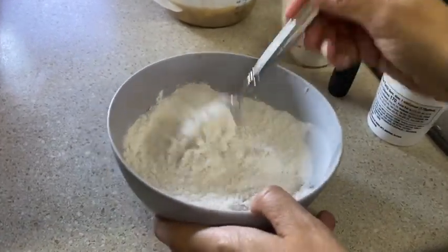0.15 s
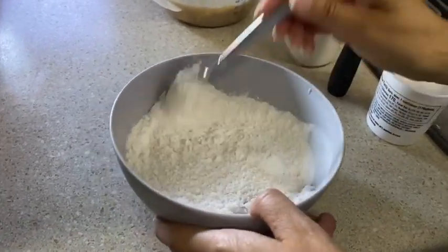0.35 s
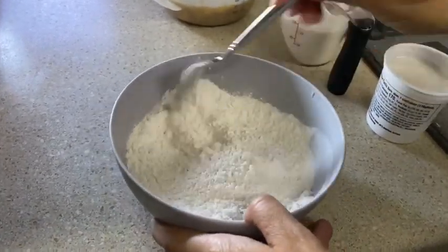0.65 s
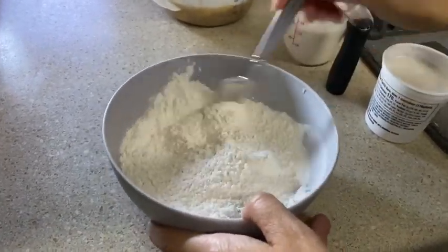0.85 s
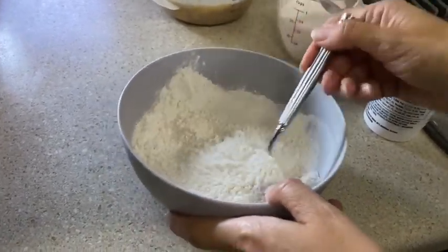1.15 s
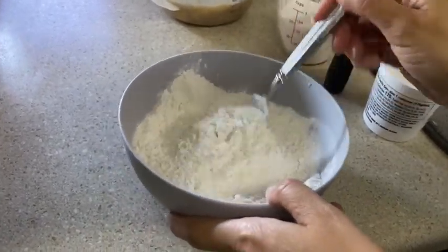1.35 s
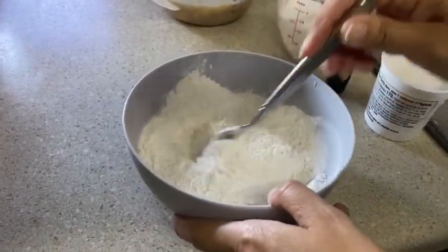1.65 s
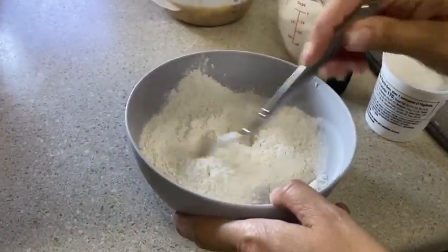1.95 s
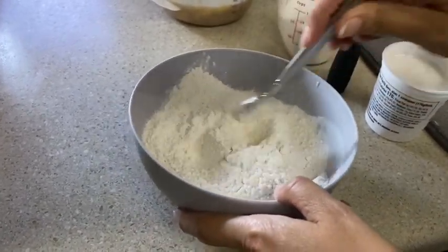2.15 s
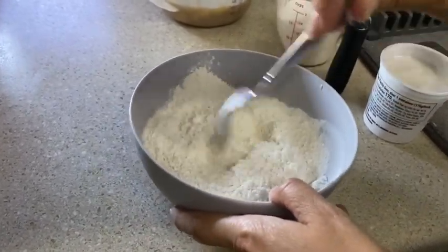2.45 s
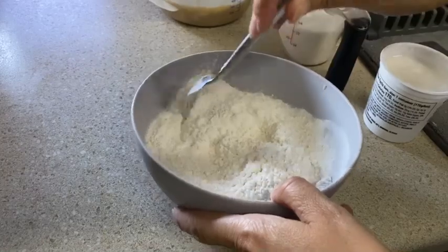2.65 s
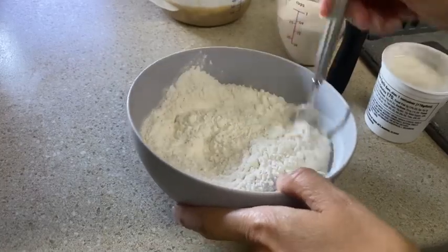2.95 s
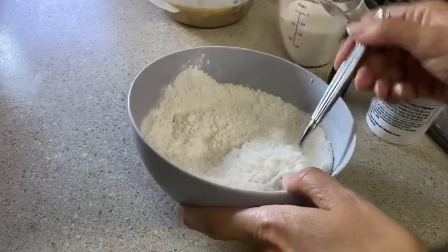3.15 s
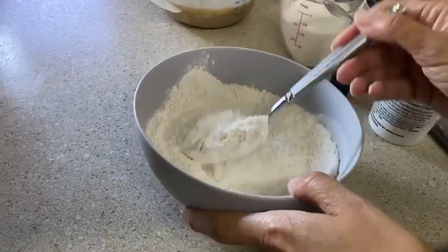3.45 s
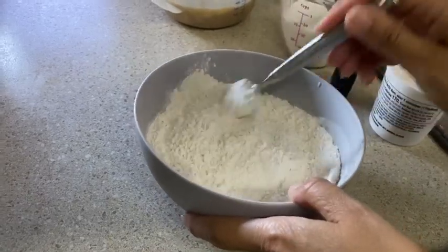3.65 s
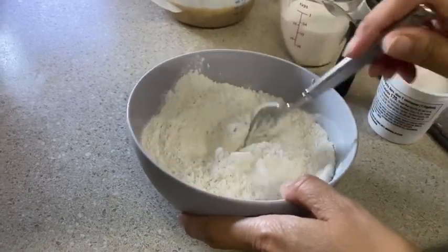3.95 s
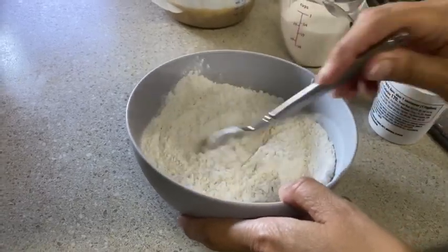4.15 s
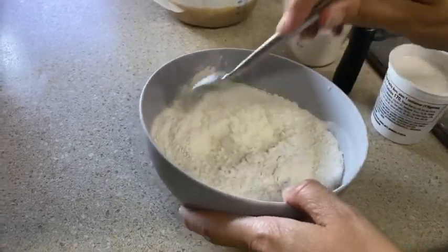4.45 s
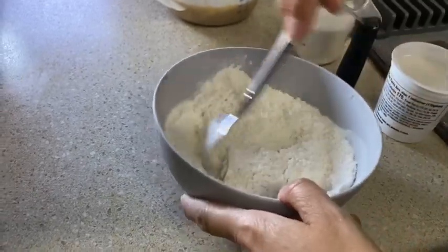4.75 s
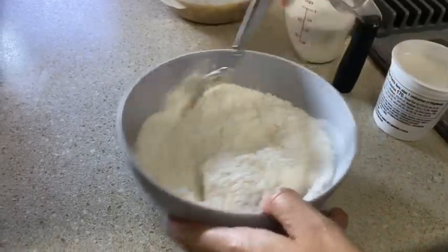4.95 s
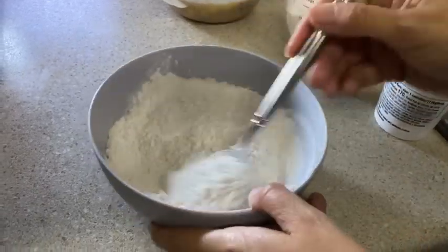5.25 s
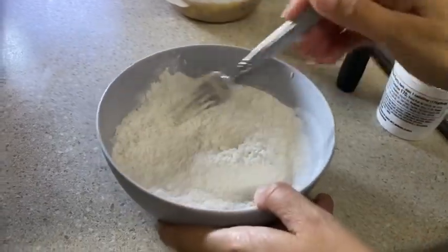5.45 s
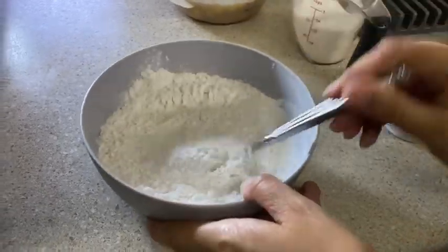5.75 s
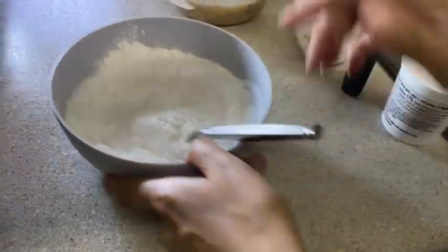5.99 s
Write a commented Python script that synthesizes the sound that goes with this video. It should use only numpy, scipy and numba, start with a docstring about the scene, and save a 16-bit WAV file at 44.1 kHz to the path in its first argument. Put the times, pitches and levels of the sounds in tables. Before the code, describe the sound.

Close up in a kitchen, a metal fork scrapes through flour in quick, uneven strokes. The tines click against the bowl and drag dry powder along its wall, while the bowl knocks and thumps softly on the counter. Underneath lie a faint trickle of flour, a steady low hum and a few barely audible bird peeps. A sharper click and a brief rub of the bowl over the counter finish the stirring.

```python
"""A kitchen counter, where a steel fork stirs flour in a hand-held bowl.
Each stroke lands with a tick of the tines and a dull knock of the bowl, whose foot thumps the counter;
then the tines drag gritty powder along the wall, and the slipping grains set bowl and fork ringing.
Flour trickles between strokes, a low hum fills the room and a far bird peeps.
At last the bowl is slid aside."""
import sys
import numpy as np
from scipy import signal
from scipy.io import wavfile
from scipy.ndimage import uniform_filter1d
from numba import njit

SR = 44100
rng = np.random.default_rng(int(sys.argv[2]) if len(sys.argv) > 2 else 0)


def put_to_file(sound):
    """Save the sound as 16-bit audio at rate SR, in the file named by the first command-line argument."""
    columns = np.atleast_2d(sound).T  # one column per channel
    safe = np.clip(columns, -1, 1)
    whole_steps = np.round(safe * 32767)
    wavfile.write(sys.argv[1], SR, whole_steps.astype(np.int16))


N = 269892

# Fork gestures, one envelope per stroke; drag is the level of the bowl's hollow:
# time_s, drag_db, hollow_hz, wall_db, grit_db
STROKES = [
    [(0.297, -54, 1800, -44, -50), (0.307, -54, 1790, -44, -49), (0.325, -76, 1810, -61, -62)],
    [(0.358, -53, 1740, -31, -26), (0.374, -40, 1850, -30.5, -36), (0.41, -34.5, 1780, -30, -39),
     (0.43, -39, 1770, -37, -41), (0.442, -65, 1850, -49, -53)],
    [(0.647, -51.5, 1940, -38.5, -40.5), (0.735, -42, 1620, -43.5, -52), (0.787, -28.5, 1790, -35, -36.5),
     (0.805, -33.5, 1770, -46, -33), (0.837, -26.5, 1800, -28.5, -29), (0.887, -29, 1930, -30.5, -27.5),
     (0.907, -38.5, 1820, -30.5, -34.5), (1.0, -46, 1990, -45.5, -50)],
    [(1.012, -35.5, 2140, -34.5, -38), (1.024, -26.5, 2300, -30, -42.5), (1.072, -40.5, 2140, -44, -47.5),
     (1.114, -39.5, 2170, -42.5, -50.5), (1.124, -64, 2140, -54, -52)],
    [(1.453, -41.5, 1930, -37.5, -47.5), (1.501, -43.5, 1940, -31, -38.5),
     (1.565, -38.5, 1630, -34.5, -46.5), (1.629, -30.5, 1470, -33, -42), (1.663, -26.5, 1720, -37, -34),
     (1.675, -36, 1810, -34, -40), (1.685, -70, 1850, -54, -45)],
    [(1.741, -37, 2110, -37, -41.5), (1.779, -35.5, 2020, -37.5, -48.5), (1.803, -23.5, 1900, -36.5, -40),
     (1.863, -35.5, 1790, -33.5, -41.5), (1.885, -40.5, 1850, -31, -34.5), (1.945, -34, 1540, -33.5, -41.5),
     (1.979, -39, 1820, -49, -51.5), (2.047, -26, 1760, -30.5, -38.5), (2.068, -79, 1690, -48, -47)],
    [(2.114, -37, 2100, -28.5, -42), (2.132, -35, 2160, -35, -45), (2.18, -29, 2200, -28.5, -37.5),
     (2.22, -33, 1900, -38, -42), (2.274, -29.5, 1880, -34.5, -38.5), (2.292, -51, 1900, -59, -53)],
    [(2.6, -29, 1950, -40, -46), (2.608, -45, 1850, -48.5, -57), (2.686, -32.5, 1730, -27.5, -36.5),
     (2.726, -33, 1720, -36.5, -37.5), (2.794, -28, 1760, -27.5, -38), (2.848, -28, 1800, -37.5, -37),
     (2.89, -40, 1880, -38.5, -42), (2.968, -28.5, 1920, -36.5, -42.5), (3.094, -51.5, 2170, -55, -58),
     (3.11, -46.5, 2250, -48, -53), (3.135, -56, 2230, -55, -58)],
    [(3.163, -51, 2220, -56, -59), (3.201, -73, 1670, -59, -59), (3.211, -87, 1480, -74, -76),
     (3.223, -44.5, 1470, -47, -46), (3.245, -74, 1460, -68, -76)],
    [(3.674, -39, 1700, -42, -47), (3.688, -51, 1780, -44, -52), (3.696, -41.5, 1960, -38, -48),
     (3.834, -31.5, 1700, -31, -42), (3.866, -32, 1600, -36.5, -37), (3.885, -74, 1664, -53, -63)],
    [(3.974, -47, 2040, -47, -43.5), (4.006, -27, 2070, -24, -35), (4.072, -33, 2040, -32.5, -39),
     (4.136, -32.5, 1760, -30.5, -42), (4.186, -34.5, 1730, -44.5, -46.5), (4.195, -69, 1810, -53, -58)],
    [(4.467, -34, 2070, -47, -46.5), (4.489, -45, 1980, -38.5, -42.5), (4.531, -37.5, 1630, -28.5, -33),
     (4.593, -44, 1720, -51, -54.5), (4.605, -61, 1720, -64, -67)],
    [(4.799, -40, 2270, -41, -49), (4.817, -43, 2220, -41, -44), (4.85, -43, 2040, -39, -43)],
    [(4.857, -35.5, 1980, -32, -42.5), (4.907, -34.5, 1760, -27, -35), (4.927, -34, 1760, -33, -36),
     (5.031, -26, 2020, -30.5, -25.5), (5.073, -41.5, 1940, -33.5, -34), (5.107, -37, 1630, -32.5, -38.5),
     (5.171, -50.5, 1950, -51, -55), (5.175, -65, 1970, -58, -62)],
    [(5.512, -24, 1910, -32, -43), (5.522, -31.5, 1800, -37.5, -47), (5.562, -27.5, 1990, -31.5, -40),
     (5.578, -33.5, 2070, -41, -39.5), (5.65, -36, 1730, -48.5, -48.5), (5.68, -55, 1820, -52, -55)],
    [(5.688, -47, 1880, -50, -49), (5.698, -35, 1870, -41, -42), (5.732, -35, 1920, -38, -41),
     (5.788, -51, 1770, -53, -60), (5.795, -44, 1770, -45, -60)],
    [(5.802, -26, 1980, -27, -33), (5.814, -42, 1990, -49, -49), (5.846, -47, 1790, -48.5, -52),
     (5.89, -45, 1540, -47, -47)],
]

def scrape():
    """Grains slip under the tines and excite bowl and fork; flour hisses dryly between the modes."""
    gate, (drag_db, hollow_hz, wall_db, grit_db) = envelopes(STROKES, fade_s=0.0058)
    favoured_hz, flank_db, dust_db, belly_db = stroke_colour(drag_db, grit_db)
    judder = flicker(77, 0.2)
    slips = grains(per_s=6000, spread_db=2.8) * judder
    fine = grains(per_s=10000, spread_db=3.2) * judder
    flour = grains(per_s=14000, spread_db=2.5) * judder
    layers = [(hollow_ring(slips, hollow_hz), drag_db), (wall_ring(slips, flour, favoured_hz), wall_db),
              (grit(fine, flour), grit_db), (dust(fine, flour), dust_db),
              (belly_ring(flour), belly_db), (flank_ring(slips), flank_db)]
    return gate * sum(from_db(db) * evened(layer, span_s=0.041) for layer, db in layers)


# Tone of each stroke's contact point, at usual drag and grit: favoured_hz, flank_db, dust_db, belly_db
CONTACTS = [(3160, -54, -43, -56.5), (3200, -45, -49.5, -44.5), (3300, -50.5, -47, -59.5),
            (2850, -55, -47.5, -62), (3300, -42, -52, -53), (3620, -42, -50.5, -49),
            (3700, -42, -49, -45.5), (3040, -54, -47, -55), (3500, -50.5, -48, -55),
            (3280, -39.5, -49.5, -44.5), (3500, -39.5, -50.5, -45), (3300, -46, -51.5, -48),
            (3250, -57, -44, -50), (3400, -51, -46, -53), (3250, -48, -48.5, -47.5),
            (3760, -47.5, -45.5, -45.5), (3450, -49, -48, -43.5)]

def stroke_colour(drag_db, grit_db):
    """Each stroke keeps its contact point; flank, dust and belly partly ride the drag and the grit."""
    starts = [rows[0][0] for rows in STROKES]
    stroke = np.maximum(np.searchsorted(starts, np.arange(N) / SR, side="right") - 1, 0)
    favoured_hz, flank_db, dust_db, belly_db = np.transpose(CONTACTS)[:, stroke]
    usual_drag_db, usual_grit_db = -36, -43
    drag_swing, grit_swing = drag_db - usual_drag_db, grit_db - usual_grit_db
    return (favoured_hz,
            flank_db + 0.44 * drag_swing + 0.05 * grit_swing,
            dust_db + 0.043 * drag_swing + 0.73 * grit_swing,
            belly_db + 0.11 * drag_swing + 0.12 * grit_swing)


def hollow_ring(slips, hollow_hz):
    """The voice of the scrape: the bowl's hollow, a gliding resonance over a shoulder of still modes."""
    radius = np.exp(-np.pi * 360 / SR)   # 360 Hz wide
    glide = gliding(slips, hollow_hz, radius, SR)
    glide = gliding(glide, hollow_hz * flicker(20, 0.5), radius, SR)
    shoulder_modes = [(1480, 100, -9), (1740, 100, -3), (1930, 200, -2), (2370, 150, -4)]
    shoulder = resonate(slips, shoulder_modes, flicker_db=3.5)
    hollow = rms_one(glide) + from_db(-7) * rms_one(shoulder)
    return band(band(hollow, 1420, 2820), 1405, 2400)


# Bright ring of the bowl's wall: pitch_hz, width_hz, level_db
WALL_MODES = [(2697, 167, -5), (2884, 150, -3), (3326, 290, -11.5), (3515, 125, -6.5), (3710, 53, -9.5),
              (4117, 173, -7), (4535, 54, -4), (4790, 154, -8.5), (5300, 170, -6.5)]

def wall_ring(slips, flour, favoured_hz):
    """The wall rings most near the pitch that the contact point favours, over a little flour hiss."""
    modes = 0
    for k, mode in enumerate(WALL_MODES):
        octaves_off = np.abs(np.log2(mode[0] / favoured_hz))
        feed = slips * from_db(-np.minimum(22 * octaves_off, 11))
        modes = modes + (-1) ** k * resonate(feed, [mode], flicker_db=4.5)
    hiss = from_db(-8.5) * band(flour, 2750, 5230)
    return band(band(rms_one(modes), 2580, 5400) + hiss, 2580, 6070)


# Steel ring of the fork: pitch_hz, width_hz, level_db
TINE_MODES = [(5720, 74, -0.5), (7100, 67, -21), (7300, 27, -12), (8700, 81, -24.5), (9900, 180, -18),
              (11130, 126, -2)]
# Tone curve of the gritty treble: frequency_hz, level_db
GRIT_COLOUR = [(2940, -32), (5000, -7.5), (6340, 2.5), (7080, 5.5), (9550, -5), (10000, -20.5),
               (13000, -41.5), (22000, -120)]

def grit(fine, flour):
    """Fine slips ring the wall's high modes and the tines, with dry hiss in between."""
    wall = rms_one(resonate(fine, crowded_modes(GRIT_COLOUR[1:-2], width_hz=100), flicker_db=7.5))
    tines = rms_one(resonate(fine, TINE_MODES, flicker_db=5.5))
    return wall + from_db(-8.5) * tines + from_db(-2) * band(flour, 5560, 9800)


# Tone curve of the finest grit: frequency_hz, level_db
DUST_COLOUR = [(9000, 0), (12000, -3.5), (14000, 2), (16000, -3.5)]

def dust(fine, flour):
    """The airy top of the scrape: the finest grit on the wall's highest modes."""
    sheen = rms_one(resonate(fine, crowded_modes(DUST_COLOUR, width_hz=150), flicker_db=2.5))
    return sheen + from_db(-11) * band(flour, 8050, 17000)


# Low body of the bowl: pitch_hz, width_hz, level_db
BELLY_MODES = [(249.4, 42, -9), (335.5, 42, -3), (601, 220, -6.5), (770, 150, -1), (920, 250, -4)]

def belly_ring(flour):
    """Dragged flour murmurs in the bowl's low modes."""
    return band(resonate(flour, BELLY_MODES, flicker_db=5.5), 202, 1200)


# Bowl modes just under the hollow: pitch_hz, width_hz, level_db
FLANK_MODES = [(1088, 166, -5), (1235, 130, -0.5), (1470, 160, 2)]

def flank_ring(slips):
    """Slips ring the bowl's flank and fill out the mids."""
    return band(resonate(slips, FLANK_MODES, flicker_db=4.5), 940, 1710)


# The bowl knocks against the holding hand: start_s, level_db, pitch_hz, thump_db
KNOCKS = [(0.177, -22, 350, -33), (0.361, -13.5, 340, -23.5), (0.649, -44.5, 313, -42),
          (0.821, -40, 300, -58), (0.916, -40.5, 366, -57), (0.96, -49.5, 330, -42),
          (1.455, -20.5, 340, -35), (1.742, -45, 310, -42), (2.118, -30.5, 330, -37),
          (2.588, -19.5, 324, -55), (2.596, -11.5, 322, -29), (2.719, -26.5, 333, -42),
          (2.922, -40, 327, -39), (3.223, -44.5, 328, -54), (3.675, -16.5, 328, -36),
          (3.976, -23.5, 320, -35.5), (4.47, -23, 294, -46), (4.55, -37, 312, -57),
          (4.925, -23.5, 328, -35), (5.246, -28, 329, -37), (5.418, -42, 362, -62),
          (5.512, -26.5, 310, -38.5), (5.823, -22, 332, -31.5), (5.927, -33.5, 340, -39)]
# Ring after a knock, the deepest mode entering last: pitch_hz, delay_s, level_db, t60_s
KNOCK_MODES = [(271, 0.013, -9, 0.059), (733, 0, -6, 0.0094), (1270, 0.0015, -14.5, 0.015),
               (537, 0.0016, -12, 0.016)]

def knocks():
    """A round tock whose pitch sags as the palm yields, rebounding three times over ringing low modes."""
    start_s, level_db, pitch_hz, _ = np.transpose(KNOCKS)
    t = np.arange(round(0.037 * SR)) / SR
    swell = (t / 0.0043) ** 2 * np.exp(2 * (1 - t / 0.0037))
    sag = 0.967 + 0.89 * np.exp(-t / 0.0011)
    gaps_s = rng.uniform(0.01013, 0.0127, (len(KNOCKS), 4))
    out = np.zeros(N + SR)
    for i in range(len(KNOCKS)):
        for bounce in range(4):
            hz = pitch_hz[i] * 0.935 ** bounce * sag
            tock = swell * np.sin(2 * np.pi * np.cumsum(hz) / SR)
            at = round((start_s[i] - 0.001 + gaps_s[i, :bounce].sum()) * SR)
            rebound_db = -5 - 1.33 * bounce ** 2 if bounce else 0
            out[at:at + len(t)] += from_db(level_db[i] + rebound_db) * tock
    out = out[:N]
    scatter_db = rng.normal(0, 0.51, (len(KNOCKS), len(KNOCK_MODES)))
    for k, (hz, delay_s, mode_db, t60_s) in enumerate(KNOCK_MODES):
        out += ring(pushes(start_s + delay_s, level_db + mode_db + scatter_db[:, k]), hz, t60_s)
    return filtered(out, 140, "high")   # a small bowl radiates little bass


# Boom of the counter: pitch_hz, level_db, t60_s
COUNTER_MODES = [(81, -21, 0.15), (106, 1, 0.14), (130.5, -4, 0.071)]

def thumps():
    """Just after each knock the bowl's foot comes down and pushes into the counter's low modes."""
    start_s, _, _, thump_db = np.transpose(KNOCKS)
    foot = pushes(start_s + 0.01907, thump_db)
    boom = sum(from_db(level_db) * ring(foot, hz, t60_s) for hz, level_db, t60_s in COUNTER_MODES)
    return filtered(boom, 220, "low")


# Tines tick on the wall: start_s, strength_db, hollow_offset_db
TICKS = [(0.1758, -34, 8.5), (0.3591, -13.5, -8), (0.648, -25, -22), (0.83, -18, -4), (1.018, -29, -11),
         (1.4529, -28, -0.5), (1.61, -30, -5), (1.7396, -31, -4), (2.1135, -21, -29), (2.118, -18.5, -12),
         (2.5854, -32, -1), (2.5946, -12.5, 2.5), (3.109, -34, 1), (3.1632, -43, -3), (3.22, -34.5, -8),
         (3.3727, -43, -11), (3.6739, -30.5, -6), (3.9736, -23.5, 1), (3.9918, -13.5, -11),
         (4.4238, -56, -4), (4.4667, -29, -6), (4.7979, -39, 3), (4.8565, -23, -8), (5.245, -42.5, 1),
         (5.2769, -48, -8), (5.3765, -31, -28), (5.4146, -41, 0), (5.5116, -18, -2), (5.6394, -41, 7),
         (5.7004, -34, 0), (5.801, -9, 0)]

def ticks():
    """An instant of hard contact: a bare click, then hollow, wall and tines ring briefly."""
    length, contact_s, flicker_db = round(0.02 * SR), 0.0006, 2.0
    bursts = rng.standard_normal((len(TICKS), length)) * np.exp(-np.arange(length) / (contact_s * SR))
    bursts[:, 0] = 3.5   # the first contact is the hardest
    bursts /= np.sqrt(np.sum(bursts ** 2, axis=1, keepdims=True))
    low, mid, high = np.zeros((3, N)) + 1e-18
    for (start_s, strength_db, hollow_offset_db), burst in zip(TICKS, bursts):
        at = slice(round(start_s * SR), round(start_s * SR) + length)
        low[at] += from_db(strength_db + hollow_offset_db) * burst
        mid[at] += from_db(strength_db) * burst
        high[at] += from_db(0.71 * strength_db - 17.5) * burst   # the treble grows more slowly
    hollow = resonate(low, [(1266, 1080, -0.5), (2040, 900, 4.0)], flicker_db)
    click = filtered(mid, [2500, 5400], "band")
    bright = filtered(high, 5200, "high") + from_db(-1) * resonate(high, TINE_MODES, flicker_db)
    wall = resonate(mid, WALL_MODES, flicker_db)
    return from_db(20) * hollow + from_db(19) * click + from_db(17) * wall + from_db(13) * bright


# Swell of the bowl sliding aside: time_s, level_db
SLIDE_SWELL = [(5.86, -46), (5.908, -42), (5.918, -37), (6.12, -33)]
# Tone curve of the slide: frequency_hz, level_db
SLIDE_COLOUR = [(120, -31), (200, -4), (334, 1.5), (547, -5), (1290, 0), (2150, -4), (2590, -6),
                (5370, -10), (13700, -14.5), (15800, -10)]

def slide():
    """The bowl's foot ring rubs over the counter with a rising hiss."""
    gate, (level_db,) = envelopes([SLIDE_SWELL], fade_s=1)
    return gate * from_db(level_db) * coloured(rng.standard_normal(N), SLIDE_COLOUR, flicker_db=3.0)


# Runs of loose flour between strokes: start_s, end_s, start_db, end_db
TRICKLES = [(0.02, 0.15, -88, -86), (0.22, 0.29, -78, -63.5), (0.463, 0.62, -69.5, -67),
            (1.148, 1.28, -88, -71), (1.303, 1.43, -60.5, -64), (2.33, 2.39, -74, -60),
            (2.41, 2.55, -57, -63.5), (3.27, 3.65, -70, -77), (4.237, 4.468, -70.5, -56),
            (4.628, 4.69, -60, -50.5), (4.71, 4.775, -51.5, -66.5), (5.194, 5.222, -64, -65),
            (5.274, 5.333, -59, -61), (5.36, 5.48, -63, -53)]
# Tone curve of falling flour: frequency_hz, level_db
FLOUR_COLOUR = [(410, -40.5), (700, -8.5), (1230, -2), (1470, -6), (2260, -2.5), (2900, -15), (3670, -7.5),
                (7810, -22.5), (15800, -31)]

def trickle():
    """Soft fine grains fall, with a dull shuffle as the heap moves."""
    ramps = [[(start_s, start_db), (end_s, end_db)] for start_s, end_s, start_db, end_db in TRICKLES]
    gate, (level_db,) = envelopes(ramps, fade_s=0.079)
    fine = coloured(grains(per_s=7000, spread_db=3.5), FLOUR_COLOUR, flicker_db=1.5)
    shuffle = coloured(rng.standard_normal(N), [(150, -3), (330, 15), (900, 2)], flicker_db=4.0)
    return gate * from_db(level_db) * (fine + from_db(-5) * shuffle)


# Tone curve of the kitchen's background: frequency_hz, level_db
KITCHEN_COLOUR = [(15, -43.5), (25, -42.5), (91, 6), (130, -3), (174, -12), (361, -17.5), (437, -25.5),
                  (542, -21.5), (749, -27), (1680, -32), (2810, -41), (3050, -29.5), (3300, -36),
                  (15800, -43)]

def kitchen():
    """A bed of low hum and hiss, with a faint narrow whistle that comes and goes."""
    hum = coloured(rng.standard_normal(N), KITCHEN_COLOUR, flicker_db=2.5)
    whistle = resonate(rng.standard_normal(N), [(2400, 90, 0)], flicker_db=5.0)
    whistle = resonate(whistle, [(2420, 170, 0)], flicker_db=5.0)
    return from_db(-55.5) * (hum + from_db(-22.5) * rms_one(whistle))


# Calls of a far bird: start_s, length_s, pitch_hz, level_db
PEEPS = [(0.233, 0.032, 3060, -65), (0.517, 0.026, 2940, -61), (1.226, 0.05, 2930, -62),
         (3.313, 0.031, 2950, -63), (3.449, 0.042, 2980, -63), (3.596, 0.032, 2930, -63.5)]

def bird():
    """Short pure peeps that drop into their pitch."""
    out = np.zeros(N)
    for start_s, length_s, pitch_hz, level_db in PEEPS:
        t = np.arange(round(length_s * SR)) / SR
        hz = pitch_hz * (1 + 0.079 * np.exp(-t / 0.0085))
        peep = np.sin(np.pi * t / length_s) * np.sin(2 * np.pi * np.cumsum(hz) / SR)
        out[round(start_s * SR):][:len(t)] += from_db(level_db) * peep
    return out


def room(x, t60_s):
    """A short diffuse tail, duller than the direct sound."""
    t = np.arange(round(0.4 * SR)) / SR
    tail = rng.standard_normal(len(t)) * from_db(-60 * t / t60_s) * (t > 0.004)
    tail = filtered(tail, 5000, "low", order=1)
    return signal.fftconvolve(x, tail / np.sqrt(np.sum(tail ** 2)))[:N]


def grains(per_s, spread_db):
    """Random slips of grains, a click each; rms 1."""
    sizes = from_db(spread_db * np.minimum(rng.exponential(1, N), 5)) * rng.choice([-1, 1], N)
    return rms_one(sizes * (rng.random(N) < per_s / SR) + 1e-9)


def envelopes(gestures, fade_s):
    """A gate that snaps open for each gesture and fades after it, and a curve for each column."""
    t, gate = np.arange(N) / SR, np.zeros(N)
    for rows in gestures:
        start_s, end_s = rows[0][0], rows[-1][0]
        gate = np.maximum(gate, (t >= start_s) * np.exp(-np.maximum(t - end_s, 0) / fade_s))
    time_s, *columns = np.transpose(np.concatenate(gestures))
    return gate, [np.interp(t, time_s, column) for column in columns]


def coloured(x, spectrum, flicker_db):
    """Third-octave bands, each at its level and flickering on its own; rms 1."""
    hz, db = np.transpose(spectrum)
    edges = np.geomspace(max(hz[0], 20), min(hz[-1], 19000), round(3 * np.log2(hz[-1] / hz[0])) + 1)
    out = 0
    for k, (low, high) in enumerate(zip(edges, edges[1:])):
        part = filtered(np.roll(x, 999 * (k % 2)), [low, high], "band")   # shift decorrelates neighbours
        level_db = np.interp(np.log(low * high) / 2, np.log(hz), db)
        out = out + part * from_db(level_db) * flicker(19, flicker_db)
    return rms_one(out)


def resonate(x, modes, flicker_db):
    """Parallel resonances, each fed with a drifting strength, as when a contact point wanders."""
    out = 0
    for k, (hz, width_hz, db) in enumerate(modes):
        r = np.exp(-np.pi * width_hz / SR)
        gain, poles = (1 - r * r) / 2, [1, -2 * r * np.cos(2 * np.pi * hz / SR), r * r]
        feed = x * from_db(db) * flicker(15.4, flicker_db)
        out = out + (-1) ** k * signal.lfilter([gain, 0, -gain], poles, feed)
    return out


def crowded_modes(spectrum, width_hz, count=26):
    """The many close high modes of a thin wall, scattered under a tone curve."""
    hz, db = np.transpose(spectrum)
    pitches = np.geomspace(hz[0], hz[-1], count) * rng.uniform(0.985, 1.015, count)
    return [(pitch, width_hz, np.interp(np.log(pitch), np.log(hz), db)) for pitch in pitches]


@njit
def gliding(x, hz, r, sr):
    """One resonance whose centre moves."""
    y = np.zeros(len(x))
    for i in range(2, len(x)):
        y[i] = x[i] - x[i - 2] + 2 * r * np.cos(2 * np.pi * hz[i] / sr) * y[i - 1] - r * r * y[i - 2]
    return y


def pushes(start_s, level_db):
    """One impulse at each start."""
    out = np.zeros(N)
    out[np.round(start_s * SR).astype(int)] = from_db(level_db)
    return out


def ring(push, hz, t60_s):
    """A unit push sets a sine of height 1 ringing down."""
    r, w = from_db(-60 / (t60_s * SR)), 2 * np.pi * hz / SR
    return signal.lfilter([0, np.sin(w)], [1, -2 * r * np.cos(w), r * r], push + 1e-18)


def flicker(rate_hz, spread_db):
    """A gain that wanders by chance, spread_db wide."""
    hop = 40
    r = np.exp(-2 * np.pi * rate_hz * hop / SR)
    slow = signal.lfilter([1], [1, -2 * r, r * r], rng.standard_normal(N // hop + 2002))[2000:]
    return np.interp(np.arange(N) / hop, np.arange(len(slow)), from_db(spread_db * rms_one(slow)))


def evened(x, span_s):
    """The colour may wander while the loudness holds; rms 1."""
    return x / np.sqrt(uniform_filter1d(x ** 2, round(span_s * SR)) + 1e-12)


def band(x, low_hz, high_hz):
    """A plain steep band; rms 1."""
    return rms_one(filtered(x, [low_hz, high_hz], "band", order=3))


def filtered(x, hz, kind, order=2):
    return signal.sosfilt(signal.butter(order, hz, kind, fs=SR, output="sos"), x)


def from_db(db):
    return 10 ** (np.asarray(db) / 20)


def rms_one(x):
    return x / np.sqrt(np.mean(x ** 2) + 1e-20)


def scene():
    """The stirred bowl up front with a touch of room; slide, trickle, hum and bird stay dry. Mono."""
    bowl = scrape() + knocks() + thumps() + ticks()
    reverb = from_db(-16) * room(bowl, t60_s=0.12)
    return (bowl + reverb + slide() + trickle() + kitchen() + bird())[None]


def record(dry):
    """The microphone drops the deep bass; the very top is cut steeply."""
    top_cut = signal.cheby2(14, 70, 16450, fs=SR, output="sos")
    return signal.sosfilt(top_cut, filtered(dry, 66, "high", order=4))


dry = scene()
out = record(dry)
put_to_file(out)
```